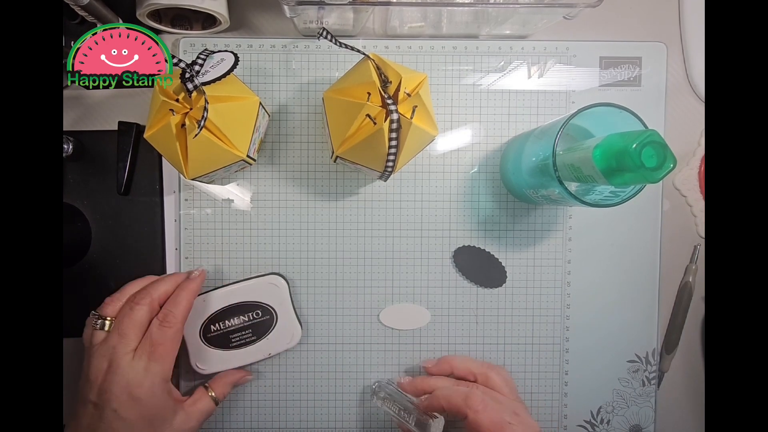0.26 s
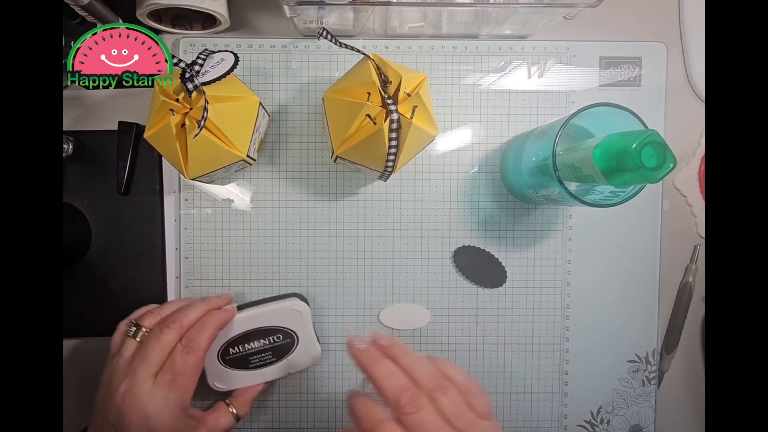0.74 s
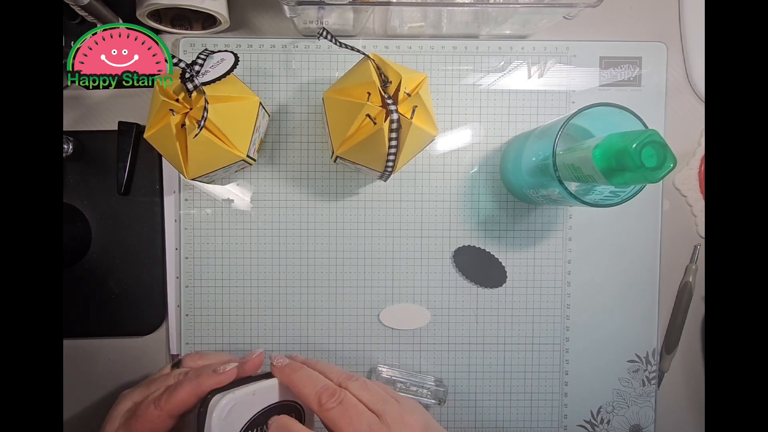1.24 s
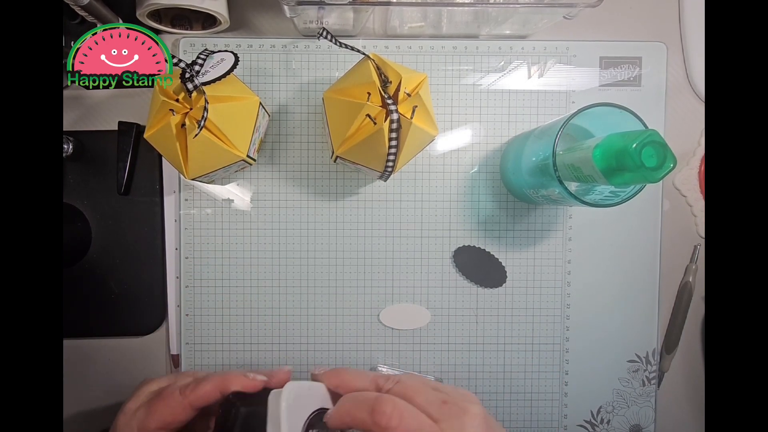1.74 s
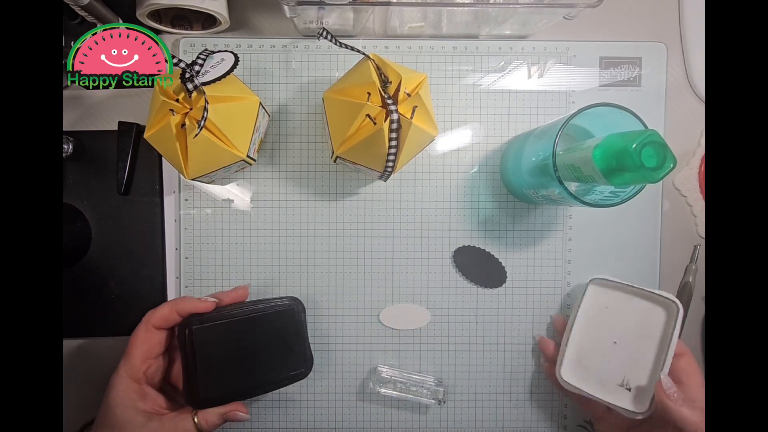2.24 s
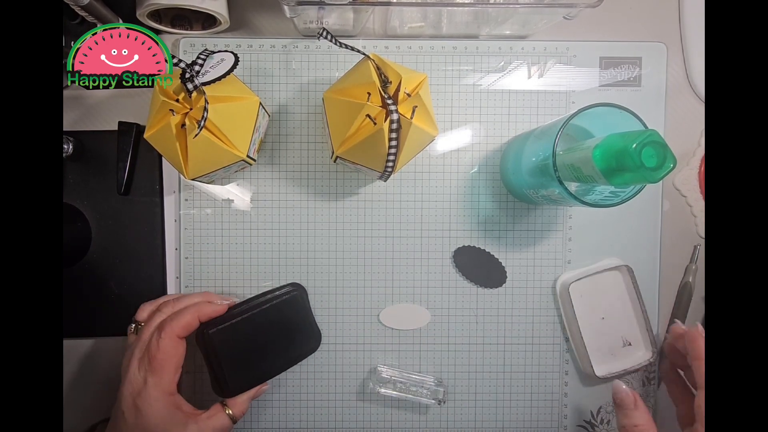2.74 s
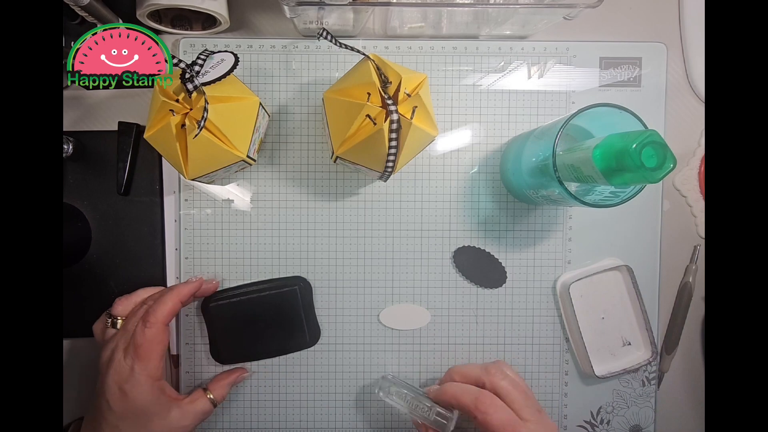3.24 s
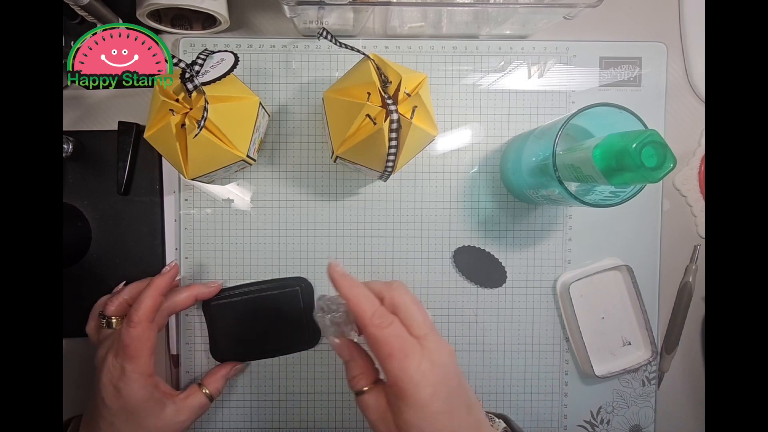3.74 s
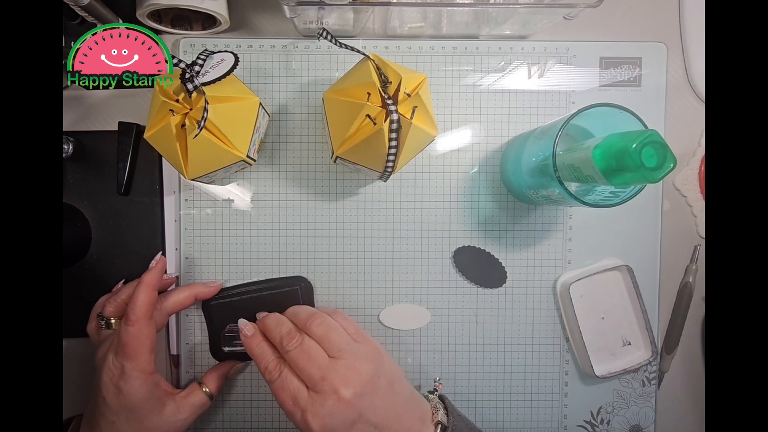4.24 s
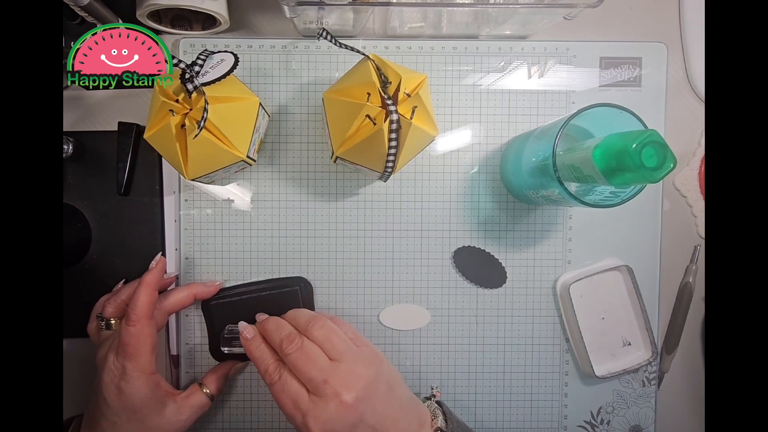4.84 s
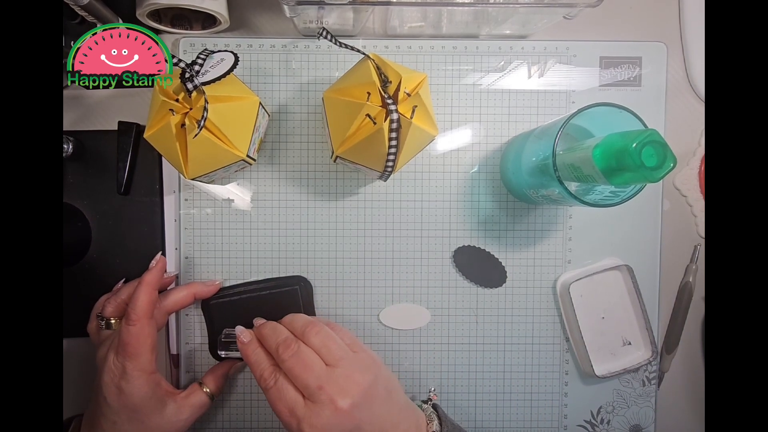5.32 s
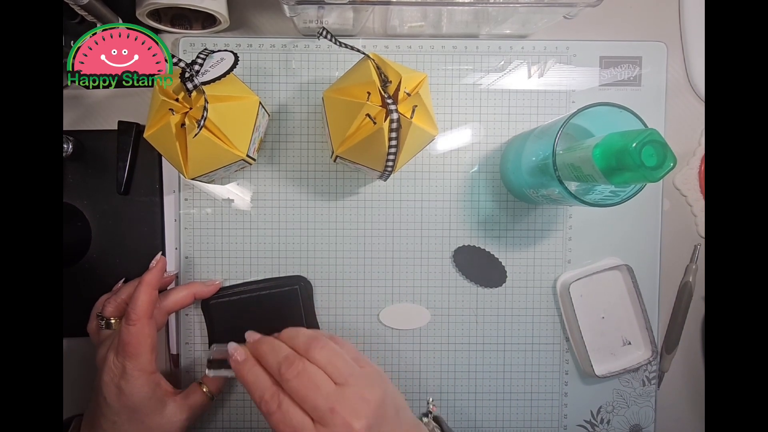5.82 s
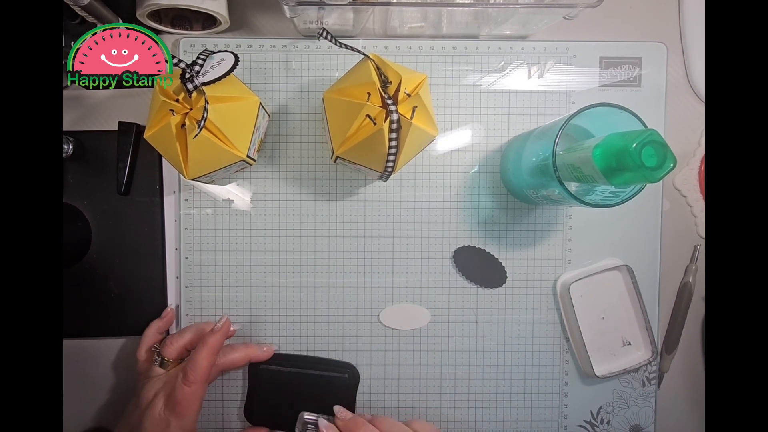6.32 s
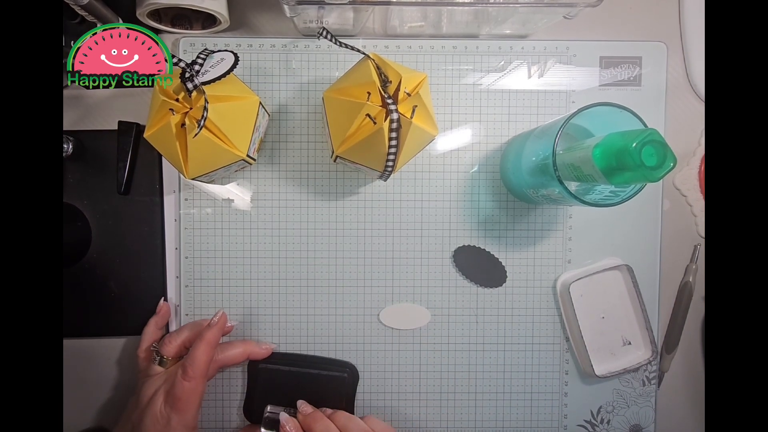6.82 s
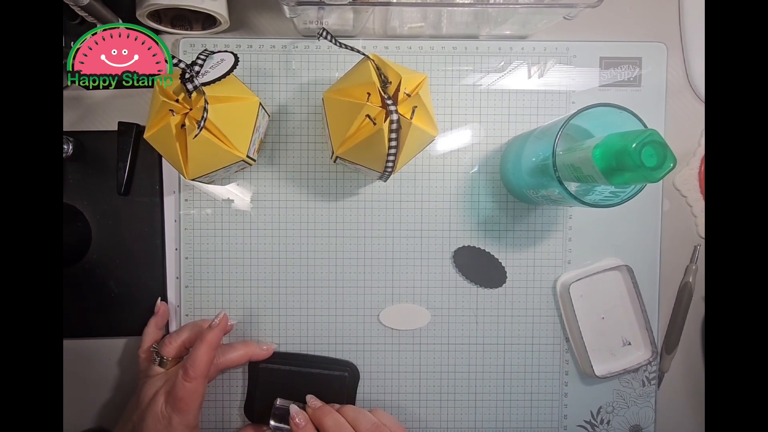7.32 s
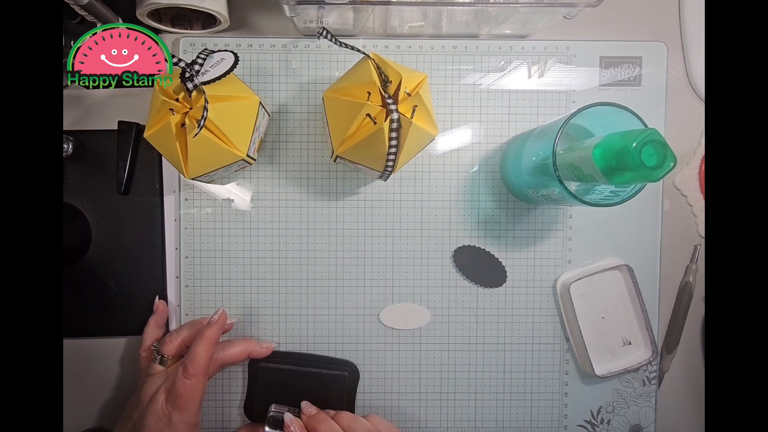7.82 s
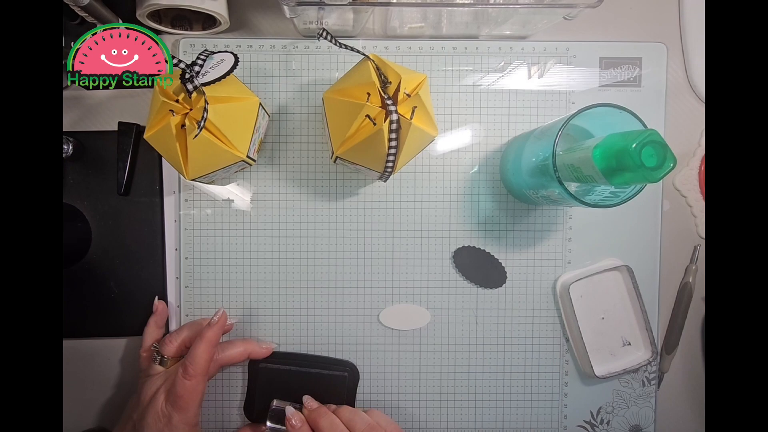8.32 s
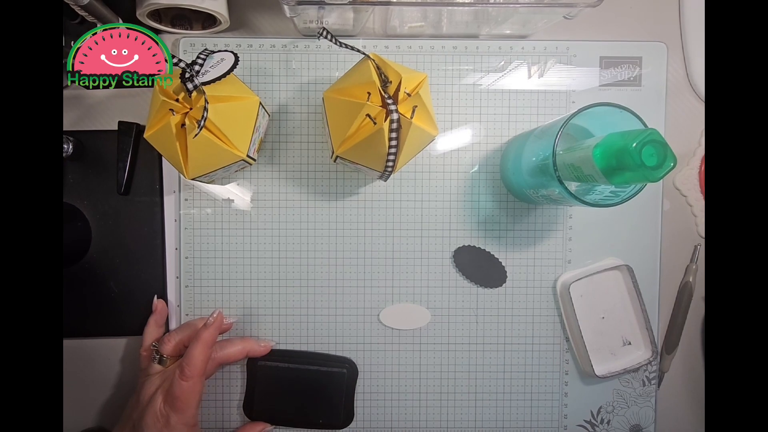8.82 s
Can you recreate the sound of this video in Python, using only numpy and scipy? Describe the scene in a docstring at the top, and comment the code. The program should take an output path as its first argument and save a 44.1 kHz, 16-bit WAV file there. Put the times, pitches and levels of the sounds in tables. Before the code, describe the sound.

Sharp plastic clicks on a craft table, then two runs of rapid dull stamp taps on a felt ink pad, some with bright ticks.

```python
"""A clear plastic stamp tapped on an ink pad: each tap swings and rings the hollow table top, knocks the pad's
tray and squeezes the felt; some catch the pad's case. First the block and the lid click on a cutting mat.
Struck things are decaying sines; hard clicks add a rasp and are balanced band by band. Skin squeaks glide in pitch;
fingers rub, the loose pad chatters, the block rocks and the pad slides, all as uneven coloured noise.
Place: a small quiet room with a low rumble, hiss and a faint whine. Two microphones above, left and right."""
import sys
import numpy as np
from scipy import signal
from scipy.fft import rfft, irfft, next_fast_len
from scipy.io import wavfile

SR = 44100
rng = np.random.default_rng(int(sys.argv[2]) if len(sys.argv) > 2 else 0)


def unload_audio(sound):
    """Save the sound as a 16-bit wav file, at the path given as the first command line argument."""
    columns = np.transpose(np.atleast_2d(sound))
    # keep every value between -1 and 1, then stretch to whole-number steps
    steps = np.round(np.clip(columns, -1, 1) * 32767)
    wavfile.write(sys.argv[1], SR, steps.astype(np.int16))


N = 399546

# taps of the rubber on the felt: start_s, table_push_db, knock_db (1-2.5 kHz), tray_db (400-900 Hz)
TAPS = [(4.252, -30, -52, -58), (4.425, -25.5, -55, -42), (4.565, -27.5, -40, -51),
        (4.712, -26, -41, -42.5), (4.837, -29, -54, -54), (4.968, -28, -46, -41), (5.099, -27, -50, -57),
        (5.233, -28, -45, -41.5), (5.358, -28.5, -50, -45.5), (5.483, -29.5, -33.5, -39),
        (5.597, -33.5, -45, -44.5), (5.735, -30, -39, -44), (5.865, -30, -50, -48.5),
        (6.603, -27.5, -52, -47), (6.751, -26.5, -39, -50), (6.884, -27, -45, -44),
        (7.025, -27, -50.5, -52), (7.164, -27, -41, -47), (7.289, -31.5, -45.5, -48.5),
        (7.447, -27, -50.5, -50.5), (7.605, -23.5, -42.5, -37), (7.746, -25.5, -34, -36),
        (7.868, -28.5, -40.5, -39), (8.02, -27.5, -38, -40), (8.168, -28, -45.5, -39.5),
        (8.301, -29.5, -51.5, -42.5), (8.436, -29, -51, -40.5)]
# the lid, later the rubber, lifts off or brushes the pad: start_s, ink_tick_db, knock_db (1-2.5 kHz),
# tray_db (400-900 Hz)
LIFTS = [(1.784, -60, -23.5, -58), (3.93, -85, -75, -46), (4.332, -46, -54, -46), (4.49, -45, -51, -42),
         (4.91, -71, -55, -55), (5.045, -65, -60, -49), (5.176, -60, -55, -50), (5.295, -68, -58, -54),
         (5.43, -68, -56, -58), (5.67, -65, -60, -50), (5.809, -63, -58, -53), (7.224, -73, -78, -67.5),
         (7.345, -59.5, -51, -66), (7.495, -67, -58, -68), (7.662, -68, -52, -42), (7.8, -57.5, -45, -56),
         (7.931, -62.5, -47, -68), (8.079, -64, -75, -73), (8.226, -67, -45.5, -48.5),
         (8.368, -60.5, -74, -52.5), (8.504, -63, -56, -48)]
# modes of the pad's tray, low and high: pitch_hz, level_db, t60_s
PAD_LOW_MODES = [(503.5, 8.5, 0.044), (684, 1.5, 0.042), (895, -18.5, 0.048)]
PAD_HIGH_MODES = [(984, -7, .014), (1473, 4, 0.0073), (1966, -10, 0.016), (2700, -19, .012)]
TAP_SHARP_DB = -5.5  # upper table modes relative to the push
SQUELCH_DB = -43  # wet felt squeezed, relative to the push
LIFT_LATE_S = 0.0068  # in a lift or brush the tray knocks just after the ink tick

# modes of the table top under the pad: pitch_hz, level_db, t60_s
TABLE_LOW_MODES = [(50, -10.5, 0.24), (108, 7.5, 0.078), (162.1, -10, 0.31)]
# its upper modes, rung by the touch itself: pitch_hz, level_db, t60_s
TABLE_HIGH_MODES = [(219, 1.5, 0.029), (241.5, 1.5, 0.04)]
# its low modes nearer the edge: pitch_hz, level_db, t60_s
TABLE_EDGE_MODES = [(56.5, -15.5, 0.64), (113, -2.5, 0.22), (159, 0, 0.2)]
# pushes on the table top by things set down: start_s, peak_db, sharpness_db (180-300 Hz re peak)
BUMPS = [(0.05, -61.5, 11.5), (0.435, -27, -5.5), (0.691, -41.5, 0), (1.213, -48.5, -20), (1.763, -33, -9),
         (2.51, -52, -29), (2.572, -52, 3), (2.727, -44.5, -7), (2.806, -49.5, -7.5), (2.924, -38.5, -8.5),
         (3.206, -42.5, -9.5), (3.255, -47.5, -1.5), (3.352, -27, -3), (3.934, -38.5, -9),
         (6.32, -54, -10.5)]

# the stamp's edge catches the pad's case: start_s, peak_db (2.5-6 kHz), sharpness_db (over 6 kHz re peak)
STAMP_ON_CASE = [(4.2502, -22.5, -24), (4.2586, -13, -3.5), (4.2696, -24.5, 3), (4.412, -32, -7),
                 (4.4291, -11, 0), (4.495, -33, -7), (4.5405, -29, -25), (4.5635, -41, 9),
                 (4.59, -29.5, 2.5), (4.6809, -34, -38), (4.6986, -43.5, 5.5), (4.7242, -41.5, 6),
                 (4.8203, -28.5, -18), (4.9537, -30, -29), (4.9731, -17.5, -3.5), (5.0815, -25, -37),
                 (5.1012, -14.5, 1.2), (5.212, -22.5, -35), (5.2378, -39, 7), (5.3427, -26, -39),
                 (5.355, -36.5, 5), (5.372, -44, 12), (5.467, -33, -36), (5.474, -27, -36),
                 (5.505, -48, 6.5), (5.593, -29, -36), (5.602, -21.5, -18), (5.616, -43.5, 14.5),
                 (5.635, -44.5, 10), (5.715, -33, -42), (5.729, -31.5, -39), (5.7504, -39.5, 7),
                 (5.764, -37, 3), (5.842, -29, -23), (5.851, -23, -25), (5.868, -41, 12),
                 (5.882, -34.5, 10), (6.604, -11.5, -6), (6.759, -36, -24), (6.886, -19.5, -9.5),
                 (6.9547, -33.5, -31), (7.0276, -19.5, -10), (7.663, -32, -16)]
# modes of the pad's case: pitch_hz, level_db, t60_s
CASE_MODES = [(498, -23.5, 0.051), (844, -18, 0.025), (1670, -8.5, 0.013), (1990, -3, 0.0166),
              (2860, -14, 0.025), (3106, -13, 0.034), (3622, -3.5, 0.034), (4680, 0.5, 0.02),
              (5396, -5.5, 0.028), (6760, -40, 0.052), (9600, -8.5, 0.012), (11920, -14, 0.011)]
# every catch has this weight (300-1000 Hz re peak); catches and felt share the left-right level
CASE_WEIGHT_DB, STAMP_PAN_DB = -14, 2.9
# the block on the mat: start_s, peak_db (2.5-6 kHz), weight_db (300-1000 Hz re peak),
# sharpness_db (over 6 kHz re peak), left_right_db
BLOCK_ON_MAT = [(0.05, -67, 34, -2, -0.5), (0.098, -52, -19, 8.5, 6.5), (0.18, -82, 29, 2, 0.5),
                (0.4365, -4.5, -14.5, -23, 0), (0.4997, -36, 3, -28, 0.5), (0.594, -55, 16.5, -15, 5),
                (0.6562, -30.5, -7, -31, 7.5), (0.691, -13, -12, -26, 0.57), (0.8214, -61.5, 19.5, 13, 4),
                (0.8755, -59, 21, -4, 5.5), (3.2065, -26.5, -12, 1, 2), (3.266, -33.5, -4.5, 8, 4),
                (3.3165, -33.5, -6, -15.5, -4), (3.342, -17, -19.5, -15.5, -2.5),
                (3.355, -2, -25.5, -5, 6.5), (3.37, -21.5, -12.5, -16, -2), (3.386, -7, -19, -1, 2.5),
                (3.6103, -34.5, -17, -21, 7.5), (3.6423, -39.5, -7, -29, 18),
                (3.6536, -32.5, -7.5, -33, 0.5), (3.688, -36.5, -23, 6, -0.5),
                (3.7125, -28.5, -24, -1, 0.5), (3.737, -24.5, -18.5, 8, 0.6)]
# modes of the block: pitch_hz, level_db, t60_s
BLOCK_MODES = [(500, -10, .03), (720, -6, .03), (1450, -4, .025), (2040, -3, .025), (2780, -2, .03),
               (3080, 0, .035), (3600, -2, .03), (4200, -7, .02), (4600, -7, .02), (5300, -13, .02),
               (6000, -14, .02), (8100, -20, .015)]
# clicks of the lid: start_s, peak_db, weight_db, sharpness_db, left_right_db (bands as for the block)
LID_CLICKS = [(1.092, -41, 3.5, -10, 5), (1.28, -52.5, 0, 10.5, -1.5), (1.4242, -39.5, -12.5, 12, 8.5),
              (1.4444, -51, 4.5, 12, -3.5), (1.7684, -43, 1, -8, 8), (1.7913, -40.5, -8, -4, -2),
              (1.8944, -52, -17, 2, 6), (2.0253, -45, -45, 2.5, 8), (2.3511, -28.5, -21.5, -37, 1),
              (2.4119, -42.5, -2.5, 4.5, 1.3), (2.5731, -17, -14.5, -18, 1), (2.5965, -22.5, -13.5, -7, 3),
              (2.6244, -25, -15, -8, 5), (2.6663, -37, -1, -16, 5), (2.7307, -35, -0.5, -9, 6.5),
              (2.807, -31.5, -4.5, -14, -2), (2.9013, -37, -11, -13, 11), (2.918, -8, -25, -11.5, 0.5),
              (2.9267, -4, -26.5, 0.5, -3.5), (2.9364, -12, -23, -14.5, 7), (2.9706, -9, -21, -1.5, 0.5)]
# modes of the lid: pitch_hz, level_db, t60_s
LID_MODES = [(704.7, -5, .04), (940, -15.5, 0.018), (1300, 0, 0.024), (1690, -16, 0.027),
             (2057, -1.5, 0.011), (3033, -8.5, 0.0068), (3563, -4.5, 0.021), (4704, -8, 0.035),
             (5220, -8.5, 0.047), (6140, -7, 0.013), (8200, -15, 0.023), (9160, -4, 0.024),
             (11300, -13, 0.032)]
MIDS_FOLLOW = 0.52  # share of a click's weight that the 1-2.5 kHz band follows

# faint squeaks of skin on the lid: start_s, length_s, first_pitch_hz, last_pitch_hz, level_db
SQUEAKS = [(1.018, .08, 2080, 2110, -78), (1.828, 0.085, 2046, 1943, -62), (2.12, 0.2, 2140, 1960, -78.5),
           (2.244, 0.2, 1940, 2110, -69), (2.36, 0.22, 2050, 2000, -73), (2.426, 0.083, 1510, 1540, -69)]
SQUEAK_WAVER_HZ = 110

# the loose pad chattering on the mat while handled and tapped: start_s, level_db, hold_s
CHATTER = [(2.57, -57, 0.52), (3.23, -54, 0.16), (3.37, -50, 0.06), (3.63, -60, .06), (3.72, -50.5, 0.013),
           (4.3, -55, 0.22), (4.62, -59, 0.18), (4.88, -61.5, 0.21), (5.12, -52.5, 0.16),
           (5.38, -66.5, 0.15), (5.64, -67.5, 0.38), (6.63, -51.5, 0.018), (6.91, -56, 0.016),
           (7.05, -61, 0.018)]
# colour of the chatter: pitch_hz, level_db (per Hz)
CHATTER_COLOUR = [(180, -35), (300, -5), (842, -10.5), (915, -19), (1280, -10), (2250, -11.5), (3030, -13),
                  (3350, -13), (11700, -19), (16000, -20)]
# the block rocks on the mat after landing: start_s, level_db, hold_s
ROCKING = [(.455, -41.5, 0.065), (.705, -50, .02)]
# colour of the rocking: pitch_hz, level_db (per Hz)
ROCKING_COLOUR = [(300, -25), (700, -10), (1500, -6.5), (3000, -1), (4800, -7), (7000, -21), (12000, -39.5)]
SHAKE_SWELL_DB_PER_S = 900  # chatter and rocking start almost at once
# fingers on the pad's case: start_s, level_db, hold_s
FINGERS = [(1.27, -63, .02), (1.42, -66.5, 0.053), (1.77, -71.5, 0.135)]
# the pad is drawn over the mat: start_s, level_db, hold_s
SLIDE = [(6.21, -50.5, 0.053)]
# colour of fingers and slide: pitch_hz, level_db (per Hz)
RUB_COLOUR = [(180, -18), (300, -12), (946, -10), (1080, -14.5), (1750, -7), (3350, -11), (4830, -6),
              (6000, -13.5), (7690, -5.5), (16000, -17.5)]

# dying time of the room: pitch_hz, t60_s
ROOM_T60 = [(100, 0.17), (300, 0.27), (1000, 0.074), (3000, 0.2), (8000, 0.034), (16000, 0.18)]
# colour of rumble and hiss: pitch_hz, level_db (per Hz)
HUSH_COLOUR = [(12, -40), (20, -8.5), (63, -10), (121, 5), (224, -15), (535, -18.5), (1050, -28),
               (2060, -29), (2580, -33.5), (2970, -31), (5990, -35.5), (7500, -36.5), (14700, -35),
               (16500, -52.5)]
HUSH_DB = -68  # rms
# a faint steady whine: pitch_hz, width_hz, level_db (rms)
WHINES = [(7760, 43, -99.5)]
LAG_PER_DB = -15.0  # samples by which the left microphone lags, per dB that it is louder
CUTOFF_HZ = 16300


def tapping():
    """Taps knock the tray and squeeze the felt; separately listed lifts and brushes tick the ink and knock the tray."""
    tap_s, push_db, *landing_db = np.transpose(TAPS)
    off_s, ink_db, *lift_db = np.transpose(LIFTS)
    landings = felt(np.transpose([tap_s, *landing_db]), touch_s=0.00054)
    lift_knocks = felt(np.transpose([off_s + LIFT_LATE_S, *lift_db]), touch_s=0.002)
    squelch = puffs(tap_s, push_db + SQUELCH_DB, 1500, 3500, crest_s=0.0064)
    ink_ticks = puffs(off_s, ink_db, 4600, 20000, crest_s=0.00067)
    return landings + lift_knocks + squelch + ink_ticks


def felt(events, touch_s):
    """Soft contact at (start_s, knock_db, tray_db): the pad's tray knocks without any snap."""
    out, t = np.zeros((3, N)), np.arange(SR // 6) / SR
    spread = rng.standard_normal((len(events), 2, 4))
    for (s, knock_db, tray_db), draw in zip(events, spread):
        tray = peak_one(ringing(PAD_LOW_MODES, t, 3 * draw[0, :3]))
        knock = peak_one(ringing(PAD_HIGH_MODES, t, 2.5 * draw[1]))
        sound = from_db(tray_db) * tray + from_db(knock_db) * knock
        add(out, sound * (1 - np.exp(-t / touch_s)), s, STAMP_PAN_DB, airborne=False)
    return out


def puffs(times, levels_db, low_hz, high_hz, crest_s):
    """Short swells of band noise, strongest crest_s after they start."""
    out, t = np.zeros((3, N)), np.arange(SR // 10) / SR
    band = signal.butter(2, [low_hz, high_hz], "band", fs=SR, output="sos")
    swell = t / crest_s * np.exp(1 - t / crest_s)
    for s, db, draw in zip(times, levels_db, rng.standard_normal((len(times), len(t)))):
        add(out, from_db(db) * swell * rms_one(signal.sosfilt(band, draw)), s, .8)
    return out


def thumps(table, modes, late_s, press_s, touch_s, deepest_hz):
    """The touch rings the upper table modes at once; the hand's weight swings the low ones a little later."""
    out, t = np.zeros((3, N)), np.arange(SR // 3) / SR
    press, touch = np.hanning(round(press_s * SR)), np.hanning(round(touch_s * SR))
    spread = rng.standard_normal((len(table), len(modes) + len(TABLE_HIGH_MODES)))  # 1 dB per mode
    for (s, peak_db, sharp_db), draw in zip(table, spread):
        low = np.convolve(ringing(modes, t, draw[:len(modes)]), press)[:len(t)]
        high = np.convolve(ringing(TABLE_HIGH_MODES, t, draw[len(modes):]), touch)[:len(t)]
        add(out, from_db(peak_db) * peak_one(low), s + late_s, .6, airborne=False)
        add(out, -from_db(peak_db + sharp_db) * peak_one(high), s, .9, airborne=False)
    # the top is too small for deep bass
    return signal.sosfilt(signal.butter(2, deepest_hz, "high", fs=SR, output="sos"), out)


def clicks(table, modes, rise_s, snap_db, rasp_db, rasp_s, mids_db):
    """The contact builds up, snaps and rings the modes, then rasps; weight brings lows and mids, an edge treble."""
    out, t = np.zeros((3, N)), np.arange(SR // 8) / SR
    edges_hz = [2500, 6000], [300, 1000], [1000, 2500], [6000, 14000]
    bands = [signal.butter(2, e, "band", fs=SR, output="sos") for e in edges_hz]
    chance = rng.standard_normal((len(table), len(t) + len(modes)))
    for (s, peak_db, weight_db, sharp_db, pan_db), draw in zip(table, chance):
        blow = peak_one(ringing(modes, t, 2.5 * draw[:len(modes)]))  # 2.5 dB of spread per mode
        blow += from_db(rasp_db) * draw[len(modes):] * np.exp(-t / rasp_s)
        blow *= 1 - np.exp(-(t / rise_s) ** 2)
        blow[round(rise_s * SR)] += from_db(snap_db)
        colour_db = np.array([0, weight_db, mids_db + MIDS_FOLLOW * weight_db, sharp_db])
        gains = from_db(peak_db + colour_db) * [1, 1, -1, -1]  # signs join the bands without holes
        click = sum(g * peak_one(signal.sosfilt(b, blow)) for g, b in zip(gains, bands))
        add(out, click, s - rise_s / 2, pan_db)
    return out


def squeaks(waver_hz):
    """Gliding thin tones of skin on plastic, whose strength and phase waver quickly."""
    out, slow = np.zeros((3, N)), signal.butter(2, waver_hz, fs=SR, output="sos")
    chance = rng.standard_normal((len(SQUEAKS), 2, SR // 2))
    for (s, length_s, first_hz, last_hz, db), draw in zip(SQUEAKS, chance):
        size = round(length_s * SR)
        in_phase, across = rms_one(signal.sosfilt(slow, draw))[:, -size:]
        phase = 2 * np.pi * np.cumsum(np.linspace(first_hz, last_hz, size)) / SR
        tone = (1 + in_phase) * np.sin(phase) + across * np.cos(phase)
        add(out, from_db(db) * np.hanning(size) * tone, s, 1.5)
    return out


def rubbing(strokes, spectrum, grains_per_s, grain_db, swell_db_per_s, fade_db_per_s):
    """Hiss of surfaces moving over each other, with uneven catches; strokes swell, hold and die away."""
    t, level = np.arange(N) / SR, np.zeros(N)
    for s, db, hold_s in strokes:
        before_s, after_s = np.maximum(s - t, 0), np.maximum(t - s - hold_s, 0)
        level += from_db(db - swell_db_per_s * before_s - fade_db_per_s * after_s)
    strength_db = grain_db + 2.5 * np.minimum(rng.exponential(1, N), 4)
    catches = (rng.random(N) < grains_per_s / SR) * from_db(strength_db)
    rough = 1 + signal.lfilter([1], [1, -np.exp(-1 / (0.0087 * SR))], catches)  # each catch fades over 8.7 ms
    return level * coloured(rough * pair(980), spectrum)


def room(dry, onset_s):
    """Dense reflections off table and walls: noise dying band by band, differing between microphones in the treble."""
    t, response = np.arange(SR // 2) / SR, 0
    noise = pair(720)[:, :len(t)]
    for k, low in enumerate(62.5 * 2 ** np.arange(8)):  # octaves
        octave = signal.butter(2, [low, 2 * low], "band", fs=SR, output="sos")
        decay = from_db(-60 * t / at_hz(ROOM_T60, low * np.sqrt(2)))
        response = response + (-1) ** k * signal.sosfilt(octave, noise) * decay
    response = response * (1 - np.exp(-t / onset_s))
    response = response / np.sqrt(np.sum(response ** 2) / 2)
    return signal.fftconvolve(dry[None], response, axes=1)[:, :N]


def hush():
    """Room rumble, microphone hiss and a faint whine: steady coloured noise and a very narrow band."""
    out = from_db(HUSH_DB) * coloured(pair(870), HUSH_COLOUR)
    for hz, width, db in WHINES:
        sos = signal.butter(2, [hz - width / 2, hz + width / 2], "band", fs=SR, output="sos")
        out = out + from_db(db) * rms_one(signal.sosfilt(sos, rng.standard_normal((2, N))))
    return out


def ringing(modes, t, strength_db):
    """Decaying sines of a struck body; neighbouring modes start with opposite sign."""
    hz, db, t60 = np.transpose(modes)[:, :, None]
    sign = (-1) ** np.arange(len(modes))[:, None]
    gain = from_db(db + strength_db[:, None] - 60 * t / t60)
    return (sign * gain * np.sin(2 * np.pi * hz * t)).sum(axis=0)


def add(out, sound, s, pan_db, airborne=True):
    """Place a sound at s, louder and (through the air) earlier in the nearer microphone; row 2 feeds the room."""
    lag = airborne * np.clip(LAG_PER_DB * pan_db, -12, 12) / 2  # samples
    for row, sign in enumerate((1, -1, 0)):
        at = max(round(s * SR + sign * lag), 0)
        part = sound[:N - at]
        out[row, at:at + len(part)] += part * from_db(sign * pan_db / 2)


def pair(alike_hz):
    """Stereo white noise, alike in both microphones well below alike_hz."""
    mid, side = rng.standard_normal((2, N))
    side = signal.sosfilt(signal.butter(1, alike_hz, "high", fs=SR, output="sos"), side)
    return mid + side * [[1], [-1]]


def coloured(x, spectrum):
    """Filter x by a spectrum in dB; rms 1."""
    size = next_fast_len(N)
    gain = from_db(at_hz(spectrum, np.fft.rfftfreq(size, 1 / SR)))
    return rms_one(irfft(rfft(x, size) * gain, size)[..., :N])


def at_hz(points, hz):
    """Read a (Hz, value) table on a log-frequency axis."""
    table_hz, values = np.transpose(points)
    return np.interp(np.log(np.maximum(hz, 1)), np.log(table_hz), values)


def from_db(db):
    """Gain of a level in dB."""
    return 10 ** (np.asarray(db) / 20)


def rms_one(x):
    """Scale to unit rms."""
    return x / np.sqrt(np.mean(x ** 2) + 1e-20)


def peak_one(x):
    """Scale to unit peak."""
    return x / np.abs(x).max()


def scene():
    """Taps, thumps, clicks and squeaks with their echoes; rubbing and the hush come without added echo."""
    soft = tapping() + squeaks(waver_hz=SQUEAK_WAVER_HZ)

    pushes = [(s, db, TAP_SHARP_DB) for s, db, *_ in TAPS]
    table = thumps(pushes, TABLE_LOW_MODES, late_s=0.0085, press_s=0.0065, touch_s=0.0014, deepest_hz=44.6)
    table += thumps(BUMPS, TABLE_EDGE_MODES, late_s=0.00067, press_s=.006, touch_s=0.00067, deepest_hz=80)

    catches = [(s, db, CASE_WEIGHT_DB, sharp_db, STAMP_PAN_DB) for s, db, sharp_db in STAMP_ON_CASE]
    hard = clicks(catches, CASE_MODES, 0.00085, snap_db=7.0, rasp_db=1.6, rasp_s=0.0038, mids_db=5.0)
    hard += clicks(BLOCK_ON_MAT, BLOCK_MODES, 0.0009, snap_db=14, rasp_db=-1.0, rasp_s=0.0068, mids_db=4)
    hard += clicks(LID_CLICKS, LID_MODES, 0.00056, snap_db=15, rasp_db=0, rasp_s=0.0049, mids_db=1.5)

    # last four settings: grains per s, grain dB, swell and fade in dB per s
    moving = rubbing(CHATTER, CHATTER_COLOUR, 220, 1.5, SHAKE_SWELL_DB_PER_S, 160)
    moving += rubbing(ROCKING, ROCKING_COLOUR, 250, 2.5, SHAKE_SWELL_DB_PER_S, 216)
    moving += rubbing(FINGERS, RUB_COLOUR, 45, 3, 110, 430)
    moving += rubbing(SLIDE, RUB_COLOUR, 80, -1.4, 393, 94)

    into_room = from_db(-7.0) * hard[2] + from_db(-3.0) * soft[2] + from_db(-8) * table[2]
    echoes = room(into_room, onset_s=0.00067)
    return (hard + soft + table)[:2] + echoes + moving + hush()


def record(dry):
    """Peaks beyond 0.93 of full scale are clipped, then the treble is cut steeply."""
    treble_cut = signal.cheby2(14, 70, CUTOFF_HZ, fs=SR, output="sos")
    return signal.sosfilt(treble_cut, np.clip(dry, -.93, .93))


dry = scene()
out = record(dry)
unload_audio(out)
```